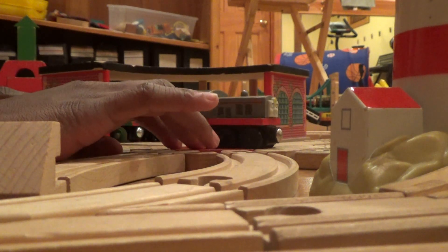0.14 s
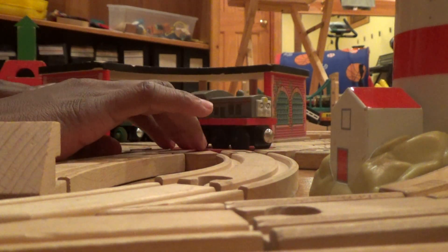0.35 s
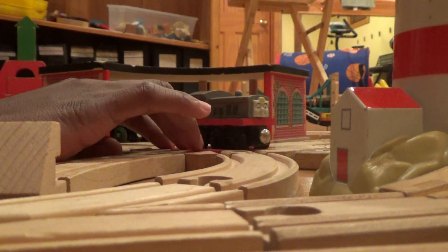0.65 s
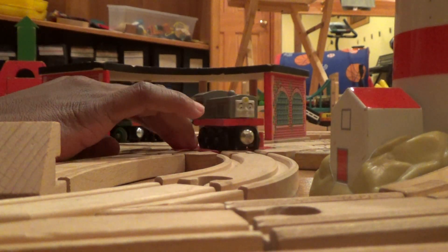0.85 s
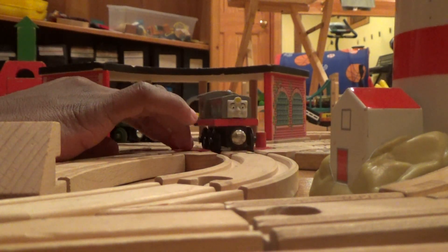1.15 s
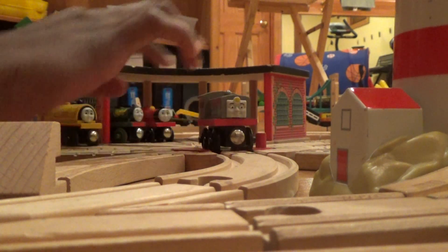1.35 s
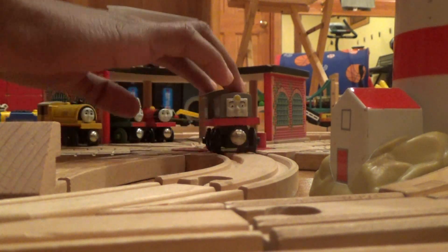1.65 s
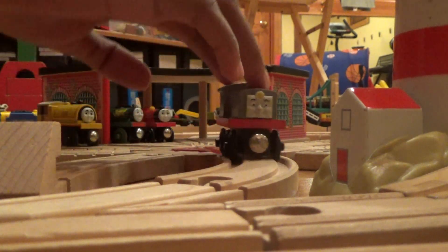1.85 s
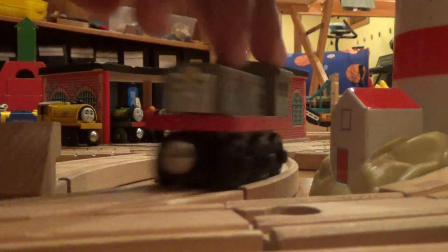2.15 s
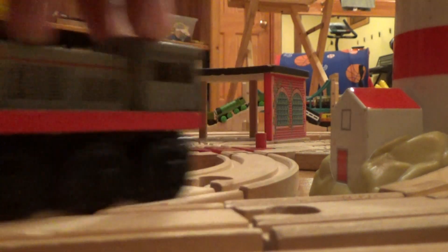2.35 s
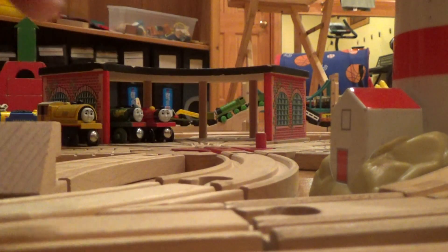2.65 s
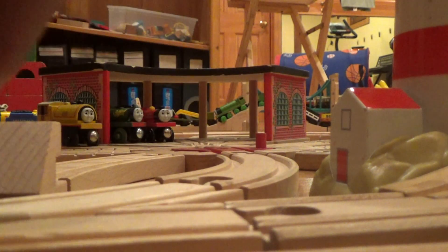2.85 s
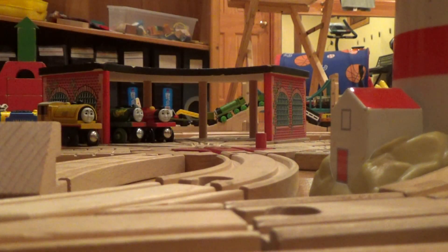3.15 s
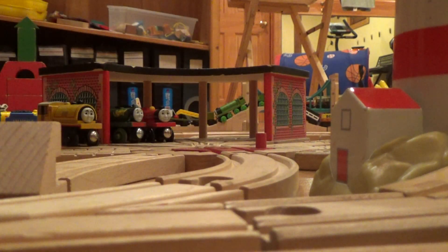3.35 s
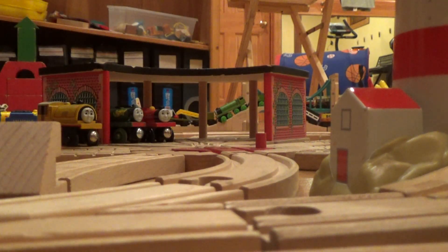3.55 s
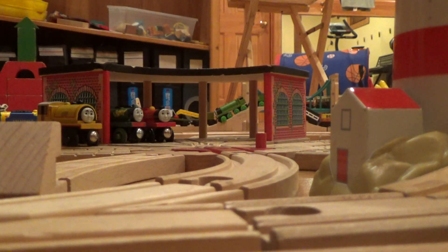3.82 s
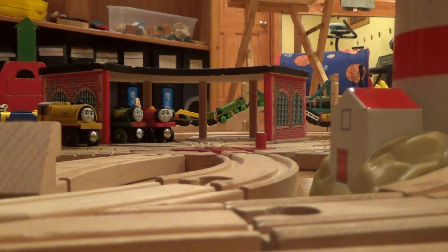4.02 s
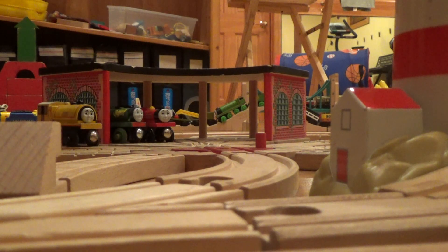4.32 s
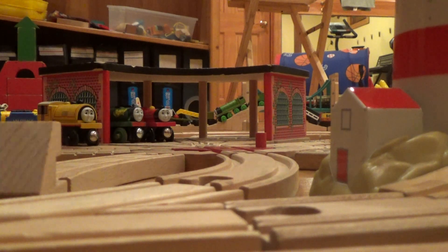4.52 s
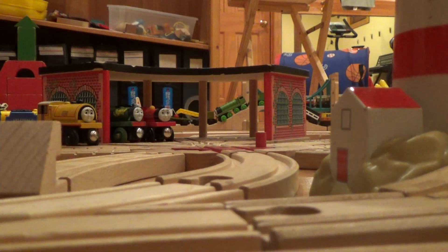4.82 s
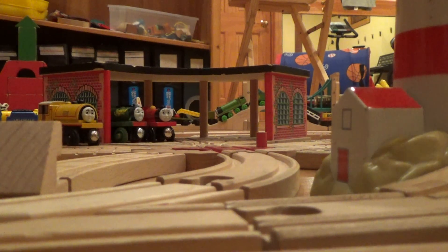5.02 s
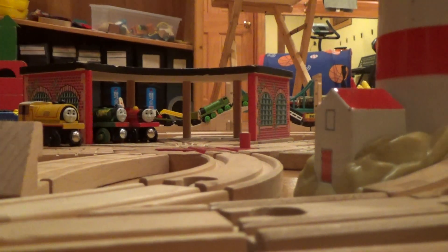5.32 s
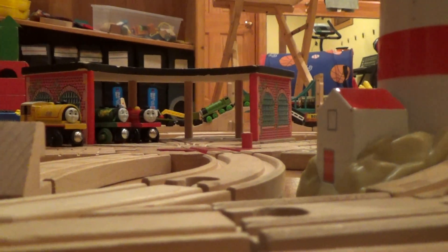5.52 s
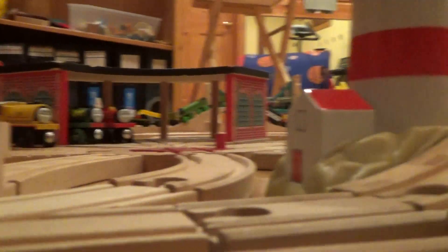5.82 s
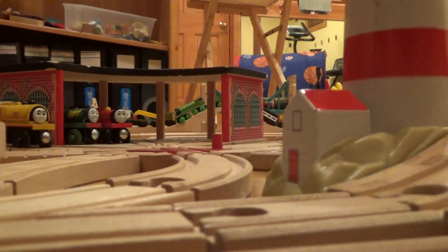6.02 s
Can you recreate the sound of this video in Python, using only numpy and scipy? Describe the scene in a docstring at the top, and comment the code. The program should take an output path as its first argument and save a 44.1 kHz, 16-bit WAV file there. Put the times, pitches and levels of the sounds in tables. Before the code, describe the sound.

Close stereo microphones on a playroom floor catch faint skin rubbing on wood and a light double click. Small wooden wheels then clatter over track joints, swelling to a dense, hard rattle as the toy passes. More pushes bring brighter clacks and a gritty scrape, then a short gap, weaker rolling and a roomy knock. Dull and sharp finger taps with rubbing on the case end it.

```python
"""A playroom floor, close by a camera lying on it: a hand pushes a wooden toy engine past over wooden track.
Fingers slide on the wood (filtered friction noise), then a magnet coupling snaps (noise cracks and ringing).
The wheels rumble (random bumps through resonances) and clack over the joints (short forces through resonances).
They roll away and hit something further off; last, fingers tap and rub the camera (forces and friction noise).
Under it all lie a quiet room, microphone hiss and a very faint ticking."""
import sys
import numpy as np
from scipy import signal
from scipy.fft import rfft, irfft, next_fast_len
from scipy.io import wavfile
from scipy.ndimage import uniform_filter1d, minimum_filter1d

SR = 44100
rng = np.random.default_rng(int(sys.argv[2]) if len(sys.argv) > 2 else 0)


def generate_wav(sig):
    """Save sig (samples, or channels by samples) to the path in sys.argv[1] as 16-bit PCM at SR."""
    pcm = np.round(np.clip(np.atleast_2d(sig).T, -1, 1) * 32767).astype(np.int16)
    wavfile.write(sys.argv[1], SR, pcm)


N = 272091
TIME = np.arange(N) / SR  # s
HZ = np.fft.rfftfreq(4096, 1 / SR)  # frequencies at which filter gains are given

# resonances of the floor (first four) and of the track on it: hz, width_hz, level_db
TRACK_MODES = [(131, 27, -14), (186.5, 29, -2.5), (254, 40, 0.5), (327, 36, 1), (431.5, 90, -6.5),
               (492.6, 61, -0.5), (554, 56, 2), (655, 58, -1), (750, 100, -8)]
# resonances of the wooden body: hz, width_hz, level_db
BODY_MODES = [(943, 43, 6.5), (1069, 105, 3.5), (1197, 220, 5), (1347, 100, 2), (1587, 125, 3.5),
              (1790, 9.1, -3.5), (1883, 54, 3.5), (2020, 12, 1), (2073, 48, 3)]
# resonances of the wheels and steel axles: hz, width_hz, level_db
WHEEL_MODES = [(2293, 73, 7.5), (2516, 72, 5), (2753, 55, 3.5), (2978, 330, 2), (3170, 105, -6.5),
               (3826, 92, -0.5), (4190, 630, -8), (5040, 25, -9), (5660, 97, -34)]
# treble colour of ticks and grit on the wood: hz, level_db
TICK_COLOUR = [(4000, 6), (6200, 13), (7500, 10), (9000, 14.5), (10400, 7.5), (11400, 13), (12200, -4),
               (16000, -1)]
# the engine's way past the camera: time_s, distance_m, left_minus_right_db
ENGINE_PATH = [(1.3, 0.3, 2.5), (1.75, 0.41, -0.5), (1.95, 0.18, 0.5), (2.08, 0.21, -1), (2.35, 0.11, 1.5),
               (2.55, 0.17, 2.2), (3.0, 0.27, 3.5), (3.5, 0.35, 3.5), (4.3, 0.3, 3), (4.55, 0.26, 3)]

PASS_S, PASS_LENGTH_S = 2.472, 0.25  # the engine goes by the lens and turns its wheels to the microphones
SCRAPE_START_S, SCRAPE_LENGTH_S = 3.43, 0.22  # a wheel flange scrapes along the groove in a bend


def amp(db):
    """Decibels to gain."""
    return 10 ** (np.asarray(db) / 20)


def evened(x):
    """Scales to rms 1."""
    return x / np.sqrt(np.mean(x ** 2) + 1e-20)


def burst(x):
    """Scales a hit so that its loudest 6 ms have rms 1."""
    return x / np.sqrt(uniform_filter1d(x ** 2, size=260).max() + 1e-20)


def read(points, hz):
    """Reads a spectrum table on a log-frequency axis."""
    table_hz, value = np.transpose(points)
    return np.interp(np.log(hz + 1), np.log(table_hz + 1), value)


def add(mix, s, sound):
    """Mixes a sound in at time s."""
    part = mix[max(round(s * SR), 0):][:len(sound)]
    part += sound[:len(part)]


def ringing(modes):
    """Gain over frequency of a set of resonances with steep skirts."""
    power = 0
    for hz, width, db in modes:
        detuning = (HZ ** 2 - hz ** 2) / (2 * width * (HZ + 1))
        power = power + amp(db) ** 2 / (1 + detuning ** 2) ** 2
    return np.sqrt(power)


def colour(x, gain):
    """Causal (minimum-phase) filter with the shape of the given gain, its peak scaled to 1."""
    log_gain = np.log(np.maximum(gain / gain.max(), 1e-5))
    circle = np.concatenate([log_gain, log_gain[-2:0:-1]])
    response = irfft(np.exp(np.conj(signal.hilbert(circle)))[:len(HZ)])
    return signal.oaconvolve(x, response)[:len(x)]


def wooden(gain, soft_hz=7500):
    """Wood gives a little on contact, so its blows hold no top treble."""
    return gain / (1 + (HZ / soft_hz) ** 4)


def grains(per_s, spread_db, hiss):
    """Tiny impacts of uneven size over a smooth hiss."""
    size = amp(spread_db * np.minimum(rng.exponential(1, N), 4))
    clicks = size * rng.choice([-1, 1], N) * (rng.random(N) < per_s / SR)
    return evened(evened(clicks) + hiss * rng.standard_normal(N))


def blow(chatter, decay_s, rise_s=.0006):
    """Contact force: a strike inside a quickly rising, then dying chatter of small rebounds."""
    t = TIME[:len(HZ) * 2]
    force = rng.standard_normal(len(t)) * np.exp(-t / decay_s) * (1 - np.exp(-t / rise_s))
    force *= chatter / np.linalg.norm(force)
    force[round(rise_s * SR)] += 1
    return force


def stroke(start, length, skew=1, sharp=1):
    """Speed of a stroke: an arch from rest to rest, whose crest comes late when skew is over 1."""
    progress = np.clip((TIME - start) / length, 1e-9, 1 - 1e-9)
    return abs(np.sin(np.pi * progress ** skew)) ** sharp


def behind(s):
    """0 while the engine comes towards the lens, 1 once it has gone by."""
    return np.clip(.5 + (s - PASS_S) / PASS_LENGTH_S, 0, 1)


def background(apart=0.35):
    """The quiet room and microphone hiss: noise mostly shared by the two microphones."""
    # colour of the quiet room: hz, level_db
    floor_colour = [(15, -41), (25, -13.5), (92, 5.5), (190, -6), (309, -1.5), (503, -9.5), (714, -7.5),
                    (775, -17.5), (887, -5.5), (1020, -12), (1740, -17), (2550, -16.5), (3430, -21),
                    (9320, -24.5), (16000, -29.5)]
    shared = rng.standard_normal(N)
    sides = []
    for _ in range(2):
        hiss = shared + apart * rng.standard_normal(N)
        sides.append(evened(colour(hiss, amp(read(floor_colour, HZ)))))
    return amp(-55.5) * np.array(sides)


def flutter(per_s=30, db=-70):
    """A very faint regular ticking, probably inside the camera: noise gated in even pulses and made to ring."""
    gate = ((1 + np.cos(2 * np.pi * per_s * TIME)) / 2) ** 4
    ticking = colour(gate * rng.standard_normal(N), ringing([(2480, 87, -6), (3160, 57, -7.5)]))
    return amp(db) * evened(ticking)


def room(x):
    """Sparse reflections, different for each microphone, each band dying at its own speed."""
    # decay time of the room: hz, t60_s
    decay = [(100, 0.38), (500, 0.38), (2000, 0.37), (5000, 0.49), (10000, 0.2), (16000, 0.053)]
    late_enough = TIME[:SR] > .005
    taps = rng.choice([-1., 1.], (2, SR)) * (rng.random((2, SR)) < 3000 / SR) * late_enough
    hz, t, z = signal.stft(taps, SR, nperseg=256)
    tail = signal.istft(z * amp(-60 * t / read(decay, hz)[:, None]), SR, nperseg=256)[1]
    return signal.fftconvolve(x[None], tail / np.linalg.norm(tail[0]), axes=1)[:, :N]


def panned(x, left_db):
    """Level difference between the two microphones."""
    return np.array([x * amp(left_db / 2), x * amp(-left_db / 2)])


def ports(x, left_db, decay_s=0.018):
    """The two microphones differ in phase and level; toys around them scatter a little unshared sound."""
    # phase between the microphones: hz, left_lag_rad
    port_phase = [(20, 0.088), (130, 0.11), (300, 0.17), (1100, 0.16), (2200, 0.57), (3500, 0.56),
                  (5300, 1), (7500, 0.76), (9500, 0.089)]
    # unshared sound, added to the left and taken from the right: hz, level_db
    scatter = [(60, -18), (200, -12), (500, -16), (1200, -8.5), (2500, -18), (4500, -22), (8000, -14),
               (12000, -47)]
    size = next_fast_len(N + len(HZ), True)
    hz, t, spectrum = np.fft.rfftfreq(size, 1 / SR), TIME[:len(HZ)], rfft(x, size)
    lag = np.exp(-.5j * read(port_phase, hz))
    pair = irfft(spectrum * np.array([lag, 1 / lag]), size)[:, :N]
    pair = pair * panned(1.0, left_db + np.zeros(N))
    echoes = rng.standard_normal(len(t)) * np.exp(-t / decay_s)
    echo_spectrum = rfft(echoes / np.linalg.norm(echoes), size) * amp(read(scatter, hz))
    side = irfft(spectrum * echo_spectrum, size)[:N]
    return pair + np.array([side, -side])


def clash(blows, spectrum, rings, wet_db, t60, late_db, late_t60, wide, air_hz=12000):
    """Hard, partly metallic blows: a short bright crack, then dense ringing that hands over to the room."""
    direct, diffuse, t = np.zeros(N), np.zeros((2, N)), TIME[:SR]
    gain = amp(read(spectrum, HZ)) * (1 + ringing(rings))
    decays = amp(wet_db - 60 * t / t60) + amp(late_db - 60 * t / late_t60)
    tail = (1 - np.exp(-t / 0.0059)) * decays
    for s, db in blows:
        shared = rng.standard_normal(SR)
        add(direct, s, amp(db) * shared * np.exp(-t / 0.0018))
        for side in diffuse:
            mixed = (shared + wide * rng.standard_normal(SR)) / np.hypot(1, wide)
            add(side, s, amp(db) * tail * mixed)
    dulled = gain / (1 + (HZ / air_hz) ** 12)  # the room swallows the top treble
    sound = colour(direct, gain) + np.array([colour(side, dulled) for side in diffuse])
    return sound / np.sqrt(np.mean((gain / gain.max()) ** 2))


def far_crash():
    """The engine hits something further off: a few blows, nearly as strong in the ringing as in the crack."""
    # blows: start_s, level_db
    blows = [(4.567, -25.5), (4.570, -20.5), (4.581, -31), (4.585, -20)]
    # colour: hz, level_db
    spectrum = [(100, -32), (175, 7.5), (350, 8.5), (570, 9.5), (900, 5), (2800, 4.5), (4200, 3.5),
                (5700, 4), (8400, 1.5), (10000, 0.5), (12000, -12.5), (16000, -6)]
    # metallic rings: hz, width_hz, db_over_colour
    rings = [(3165, 25, 1), (5209, 22, 12), (5298, 22, 6), (5943, 25, 0), (6826, 30, -4), (8373, 22, 5),
             (9959, 25, 0)]
    return clash(blows, spectrum, rings, wet_db=-3.0, t60=0.087, late_db=-8.0, late_t60=0.57, wide=0.47)


def coupling_snap():
    """The magnet coupling pulls shut and bounces: dry cracks with little ringing after them."""
    # blows: start_s, level_db
    blows = [(1.518, -16), (1.5205, -13.5), (1.5295, -22), (1.536, -25)]
    # colour: hz, level_db
    spectrum = [(40, -40), (100, -28), (150, 7.5), (350, 0.5), (650, -2.5), (1200, -12), (1800, -2),
                (3500, 2.5), (5000, 2), (6800, -4.5), (8500, -16), (11000, -27), (16000, -49)]
    # metallic rings: hz, width_hz, db_over_colour
    rings = [(1750, 30, 2), (2180, 30, 2), (3526, 30, 5), (4554, 30, 0), (6460, 40, 2)]
    return clash(blows, spectrum, rings, wet_db=-24, t60=0.31, late_db=-34.0, late_t60=0.61, wide=0.57)


def rubbing(rub_db=-2.5, rasp_db=-3, rasp_hz=8900, rasp_width_hz=2700):
    """Skin drags over the camera's case; the hardest strokes add a bright rasp."""
    # strokes of skin, before the rub_db trim: start_s, length_s, level_db
    strokes = [(4.75, 0.69, -47), (5.132, 0.086, -32.5), (5.273, 0.019, -45.5), (5.403, 0.19, -48),
               (5.549, 0.16, -43.5), (5.71, 0.49, -44), (5.775, 0.06, -36.5), (5.822, 0.057, -31.5),
               (6.106, 0.042, -44.5)]
    # colour of skin on the case: hz, level_db
    case_colour = [(50, -5.5), (120, 2), (290, 10), (520, 4), (700, 6), (1100, 3.5), (1600, -0.5),
                   (2700, -0.5), (4500, -3.5), (5500, -7.5), (9300, -5), (11500, -13), (13700, -30),
                   (16000, -16)]
    effort = sum(amp(db) * stroke(start, length, skew=0.67, sharp=0.84) for start, length, db in strokes)
    friction = grains(per_s=1800, spread_db=0.0, hiss=0.76)
    drag = evened(colour(friction, amp(read(case_colour, HZ))))
    bright = evened(colour(friction, ringing([(rasp_hz, rasp_width_hz, 0)])))
    rasp = amp(rasp_db) * effort / effort.max() * bright
    return amp(rub_db) * effort * (drag + rasp)


def tapping(tap_db=-7, thump_db=-1, tick_db=-2, ring_width_hz=380):
    """Fingers tap the camera's case, which hardly rings; a nail sounds broader than a fingertip."""
    # taps, before the trims: start_s, level_db, ring_hz, thump_db, treble_tick_db, hardness (0 to 1)
    taps = [(4.837, -18, 790, -32.5, -51, 0), (4.8393, -28.5, 1340, -36.5, -43, 0.18),
            (4.9489, -33.5, 1300, -44, -98, 0.2), (5.127, -27, 1260, -60, -34.5, 1),
            (5.2009, -19.5, 890, -18.5, -37, 0.06), (5.4597, -19, 1200, -41.5, -41.5, 0.07),
            (5.5454, -20, 1290, -40, -56, 0), (5.5909, -23, 1036, -24.5, -39.5, 0.6),
            (5.6601, -20, 1960, -47, -36.5, 1), (5.766, -19, 1260, -53, -41, 0),
            (5.772, -18.5, 1130, -52, -44, 0.03), (5.7795, -9, 1410, -54, -26.5, 0.4),
            (5.8422, -17.5, 1130, -34, -31.5, 0.3), (5.9737, -29.5, 3140, -35.5, -38.5, 0.9)]
    # colour of the tapped case: hz, level_db
    case_colour = [(500, -9), (900, -2), (1300, -2), (2000, -3), (3000, -2.5), (4800, -4), (6500, -28)]
    # colour of the thump: hz, level_db
    thump_colour = [(40, -35), (110, 2), (230, 8.5), (380, 2), (700, -4.5), (1200, -71)]
    out = np.zeros(N)
    for s, level, hz, thump, treble, hardness in taps:
        force = blow(chatter=1.64, decay_s=0.0049, rise_s=0.00064)
        case = amp(read(case_colour, HZ)) * (abs(hardness) + ringing([(hz, ring_width_hz, 0)]))
        add(out, s, amp(level + tap_db) * burst(colour(force, case)))
        soft_force = blow(chatter=0.49, decay_s=0.013, rise_s=0.00068)
        add(out, s, amp(thump + thump_db) * burst(colour(soft_force, amp(read(thump_colour, HZ)))))
        tick_force = blow(chatter=1.7, decay_s=0.0019, rise_s=0.0024)
        add(out, s, amp(treble + tick_db) * burst(colour(tick_force, ringing([(8060, 2400, 0)]))))
    return out


def sliding(hiss_db=0, murmur_db=0.0, skew=1.72, sharp=1.02):
    """Fingertips slide along the track, hissing and murmuring; each stroke swells slowly and stops quickly."""
    # strokes of skin along the track: start_s, length_s, hiss_db, track_murmur_db
    strokes = [(-0.1, 0.16, -57, -48), (0.174, 0.21, -56.5, -45), (0.312, 0.25, -40.5, -49.5),
               (0.671, 0.15, -56, -56.5), (0.75, 0.21, -57.5, -61.5), (1.205, 0.023, -52, -56),
               (1.258, 0.037, -49, -63)]
    # colour of skin on wood: hz, level_db
    skin_colour = [(710, -51), (1200, -5), (1270, -12), (1520, -2), (1830, -2), (2710, 6), (4220, 6),
                   (5020, -4), (6230, -6.5), (9210, 0.5), (16000, -31)]
    hiss, murmur = np.zeros((2, N))
    for start, length, skin_db, wood_db in strokes:
        speed = stroke(start, length, skew, sharp)
        hiss = hiss + speed * amp(skin_db + hiss_db)
        murmur = murmur + speed * amp(wood_db + murmur_db)
    friction = grains(per_s=3200, spread_db=1.5, hiss=1.3)
    skin = evened(colour(friction, amp(read(skin_colour, HZ))))
    wood = evened(colour(friction, ringing([(375, 120, -12.5), (570, 176, -1.0), (900, 110, -10)])))
    return hiss * skin + murmur * wood


def clacks(clack_db=-7, thud_db=-2, wheel_db=-1, tick_db=-36, tick_behind_db=5, tick_bend_db=6,
           ring_width_hz=330, broad=0.11, hollow_behind_db=-8, dead=0.84):
    """Each drop of a wheel thuds in the track, rings the body near one pitch, rings the wheel and ticks."""
    # loudest drops over a joint, before the trims: start_s, clack_db, body_ring_hz, track_thud_db, wheel_ring_db
    drops = [(0.2837, -41, 2140, -32, -49.5), (0.3149, -32.5, 2220, -31.5, -58),
             (1.287, -41, 3200, -43, -65), (1.506, -23.5, 3550, -34.5, -32),
             (1.6459, -26.5, 2300, -31, -42), (1.7394, -20, 3670, -19.5, -41), (1.764, -23, 2470, -23, -41),
             (1.8165, -23.5, 2410, -24, -45), (1.8567, -7.5, 3610, -20, -14), (1.8714, -17, 2380, -23, -28),
             (1.935, -15.5, 2110, -41, -22), (1.9388, -9, 3100, -16, -17), (1.9576, -21, 1190, -43, -20),
             (1.9809, -18.5, 2120, -30, -20.5), (2.0206, -18.5, 2260, -33, -31),
             (2.092, -16.5, 2480, -41, -32), (2.1284, -12.5, 2050, -30, -28),
             (2.1922, -4, 2230, -9.5, -17.5), (2.2028, -11.5, 2830, -21, -23),
             (2.2131, -14.5, 1810, -28, -24), (2.226, -13.5, 1780, -19, -37), (2.261, -16, 1840, -19, -22),
             (2.2648, -14, 1850, -26, -22), (2.3142, -14, 1700, -14.5, -36), (2.3201, -12, 1830, -21, -33),
             (2.3325, -11, 1780, -38, -27), (2.3365, -10.5, 1800, -42, -21), (2.3601, -9.5, 1060, -15, -31),
             (2.387, -12.5, 1920, -22, -20.5), (2.4004, -11.5, 1800, -21.5, -30),
             (2.4114, -17, 2180, -19, -21), (2.423, -13, 1190, -17.5, -30),
             (2.4326, -10.5, 1900, -19, -26.5), (2.5254, -19.5, 1540, -16.5, -32),
             (2.6059, -19, 2210, -20.5, -36.5), (2.679, -31, 2080, -33, -49),
             (2.703, -21.5, 1890, -25, -66), (2.7944, -27, 1970, -36, -62), (2.832, -25, 1550, -23, -32),
             (2.8408, -20, 1100, -20.5, -40), (2.8511, -14, 2220, -18.5, -51),
             (2.8684, -17, 2830, -30, -32.5), (2.909, -25.5, 2500, -14.5, -42),
             (2.9332, -13.5, 2370, -21.5, -35), (2.9625, -24.5, 2940, -43, -32),
             (3.0008, -16, 1430, -26, -53), (3.015, -11, 2320, -19, -19.5), (3.0364, -19, 1950, -17, -49),
             (3.1203, -14.5, 2070, -21.5, -21.5), (3.1244, -19, 3270, -29, -22),
             (3.131, -3, 2850, -34, -11), (3.1437, -11, 3150, -29, -20), (3.2025, -12.5, 2050, -22, -30.5),
             (3.271, -17.5, 2850, -30.5, -23.5), (3.3906, -25, 2870, -14.5, -29),
             (3.3979, -11, 3030, -28, -22), (3.428, -17, 2920, -47, -30), (3.4497, -12, 2980, -51, -20),
             (3.4742, -10, 3100, -47, -22), (3.485, -4, 3030, -50, -11.5), (3.5086, -19, 2960, -62, -30),
             (3.5174, -26, 2790, -57, -29), (3.531, -15.5, 2780, -47, -44), (3.5748, -17, 2930, -17.5, -27),
             (3.6056, -18.5, 2370, -26, -30), (3.6588, -12, 2570, -33, -22.5), (3.698, -27, 2480, -24, -37),
             (3.7656, -31, 2530, -30, -48), (3.8169, -32.5, 2320, -29, -63),
             (4.0876, -41, 1470, -36.5, -52), (4.1301, -41, 2750, -36, -56), (4.168, -29, 2250, -53, -46),
             (4.176, -22, 2370, -39, -26), (4.222, -25, 2930, -27.5, -39), (4.2603, -27.5, 1780, -34, -43),
             (4.3252, -27.5, 2550, -37, -49), (4.342, -19, 3000, -28, -25.5), (4.3827, -26, 2700, -35, -51),
             (4.4903, -27, 2660, -47, -43)]
    # rings of a dropped wheel heard from the front: hz, width_hz, level_db
    rim_front = [(3710, 250, -2), (4500, 960, -17)]
    # the same heard from behind: hz, width_hz, level_db
    rim_behind = [(3444, 850, 6), (4260, 620, -2), (5500, 510, -2)]
    out = np.zeros(N)
    floor = ringing(TRACK_MODES[:4])
    track = ringing(TRACK_MODES[4:]) + 0.11 * ringing([(584, 92, 0.0044)])
    engine = ringing(BODY_MODES) + ringing(WHEEL_MODES[:4])
    tick = amp(read(TICK_COLOUR, HZ))
    axle = 1 + ringing([(5209, 25, 4), (5298, 25, 4)])  # a steel axle sings on when a wheel rings near its pitch
    for s, level, hz, thud, wheel in drops:
        force, gone_by = blow(chatter=2.13, decay_s=0.0029, rise_s=0.0008), behind(s)
        body = wooden(broad * engine + (dead + engine) * ringing([(hz, ring_width_hz, 0)]))
        add(out, s, amp(level + clack_db) * burst(colour(force, body)))
        rim = (1 - gone_by) * ringing(rim_front) + gone_by * ringing(rim_behind)
        add(out, s, amp(wheel + wheel_db) * burst(colour(force, axle * wooden(rim))))
        boards = track + amp(hollow_behind_db * gone_by) * floor
        add(out, s, amp(thud + thud_db) * burst(colour(force, boards)))
        in_bend = 0 < s - SCRAPE_START_S < SCRAPE_LENGTH_S  # ticks are sharper where the flange catches
        bright_db = tick_behind_db * gone_by + tick_bend_db * in_bend
        tick_force = blow(chatter=1.2, decay_s=0.0048, rise_s=0.0014)
        add(out, s, amp(level + tick_db + bright_db) * burst(colour(tick_force, tick)))
    return out


def pushed(start, let_go, speed_up_s=0.057, coast_db_per_s=117):
    """Speed of the engine in one push: it picks up quickly, holds, then runs down once let go."""
    return np.clip((TIME - start) / speed_up_s, 0, 1) * amp(-coast_db_per_s * np.maximum(TIME - let_go, 0))


def jiggles(per_s=47, uneven=0.54, spread_db=3, decay_s=0.001, db=-3):
    """The loose wheels knock lightly on their axles in an uneven patter."""
    late, size = rng.standard_normal((600, 2)).T
    knocks = np.zeros(N)
    for k in range(len(late)):
        add(knocks, (k + uneven * late[k]) / per_s, amp(spread_db * size[k]) * np.exp(-TIME[:1000] / decay_s))
    return amp(db) * evened(knocks * rng.standard_normal(N))


def shaken(bumps, modes, uneven=0.57):
    """Every bump lands on another spot, so it favours other modes."""
    spots = rng.standard_normal((len(modes), N // 64 + 1)).repeat(64, axis=1)[:, :N]
    total = 0
    for mode, spot in zip(modes, spots):
        rung = colour(bumps * (1 + uneven * spot), wooden(ringing([mode])))
        total = total + amp(mode[2]) * rung  # colour() peaks at 1, so the mode's level is set here
    return evened(total)


def flange_scrape(jolts, grit, db=-27, hz=3000, width_hz=360, hiss_db=-25):
    """A wheel flange scrapes along the groove in a bend: jolts through one resonance, and a little grit."""
    squeal = evened(colour(jolts, ringing([(hz, width_hz, 0)])))
    bend = amp(db) * stroke(SCRAPE_START_S, SCRAPE_LENGTH_S, skew=0.66, sharp=0.94)
    return bend * (squeal + amp(hiss_db) * grit)


def rolling(rumble_db=-2, chatter_db=7, shadow_db=-10, rattle_db=-1, fizz_db=-23, fizz_behind_db=8,
            buzz_db=-14, track_falloff=0.98, low_cut_hz=135, boom_db=-19, boom_hz=134, boom_width_hz=26):
    """Wheels cross the grain of the wood and shake floor, track, body and axles; rumble carries a bit further."""
    # pushes of the hand, before the trims: start_s, let_go_s, track_rumble_db, engine_rattle_db, floor_over_track_db
    pushes = [(1.596, 1.66, -24.5, -46, 3.5), (1.703, 2.51, -20.5, -32, -2.5), (2.551, 2.609, -24, -47, 1),
              (2.871, 3.081, -16, -30, -3.5), (3.194, 3.31, -30, -40.5, -7), (3.342, 3.705, -21, -29, -2),
              (4.1, 4.497, -26, -33, -3)]
    s, distance, _ = np.transpose(ENGINE_PATH)
    near, gone_by = 0.1 / np.interp(TIME, s, distance), behind(TIME)  # gain 1 at 0.1 m
    floor, track, engine, push = np.zeros((4, N))
    for start, let_go, rumble, rattle, hollow in pushes:
        speed = pushed(start, let_go)
        push = push + speed * amp(rattle)
        shake = speed * near ** track_falloff * amp(rumble + rumble_db) / np.hypot(amp(hollow), 1)
        floor = floor + shake * amp(hollow)
        track = track + shake
        engine = engine + speed * near * amp(rattle)

    bumps = grains(per_s=300, spread_db=2, hiss=0.37)
    boards = floor * shaken(bumps, TRACK_MODES[:4]) + track * shaken(bumps, TRACK_MODES[4:])
    boards = colour(boards, 1 / (1 + (low_cut_hz / (HZ + 1)) ** 6))  # small pieces radiate little bass
    # the floor behind the camera booms at any distance of the engine
    boom = amp(boom_db) * push * gone_by * shaken(bumps, [(boom_hz, boom_width_hz, 0)])

    jolts = evened(bumps + jiggles())
    buzz = amp(buzz_db) * evened(colour(jolts, wooden(ringing([(1400, 400, 0)]))))
    body = amp(chatter_db + shadow_db * gone_by) * (shaken(jolts, BODY_MODES) + buzz)
    axles = amp(rattle_db) * shaken(jolts, WHEEL_MODES)
    grit = evened(colour(grains(per_s=470, spread_db=3.0, hiss=0.94), amp(read(TICK_COLOUR, HZ))))
    fizz = amp(fizz_db + fizz_behind_db * gone_by) * grit
    return boards + boom + engine * (body + axles + fizz) + flange_scrape(jolts, grit)


def scene(room_db=-16, camera_room_db=-22):
    """Engine and fingers reach the microphones directly and by the room; snap and crash bring their own tails."""
    train = rolling() + clacks() + sliding()
    fingers = tapping() + rubbing()
    s, _, left_db = np.transpose(ENGINE_PATH)
    near = ports(train, np.interp(TIME, s, left_db)) + ports(fingers, left_db=2.0, decay_s=0.0054)
    echo = room(amp(room_db) * train + amp(camera_room_db) * fingers)
    return near + echo + coupling_snap() + far_crash() + background() + flutter()


def record(dry, ceiling_db=-6.0, edge_hz=15950):
    """A fast limiter holds down the hardest clacks; then the recorder's band limit."""
    allowed = np.minimum(1, amp(ceiling_db) / (abs(dry).max(0) + 1e-9))
    limited = dry * uniform_filter1d(minimum_filter1d(allowed, size=130), size=130)
    band_limit = signal.firwin(511, edge_hz, window=("kaiser", 9), fs=SR)
    return signal.oaconvolve(limited, band_limit[None], "same")


dry = scene()
out = record(dry)
generate_wav(out)
```